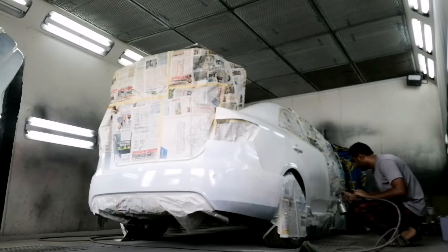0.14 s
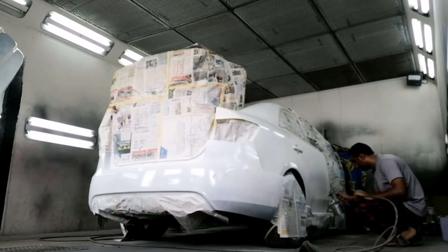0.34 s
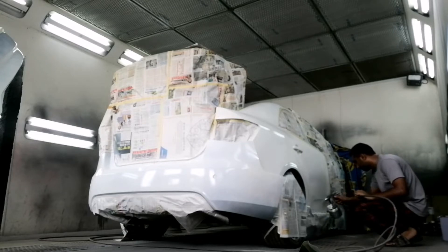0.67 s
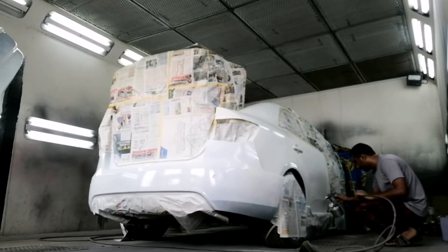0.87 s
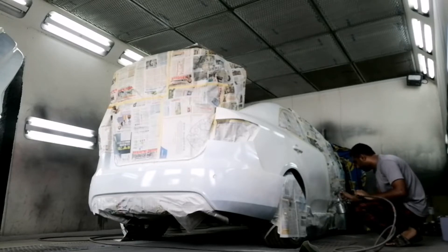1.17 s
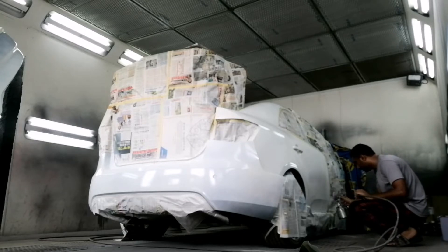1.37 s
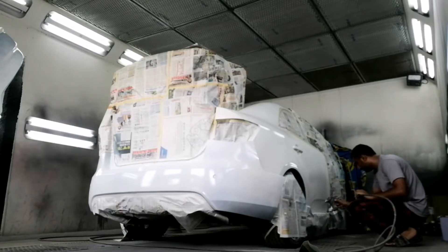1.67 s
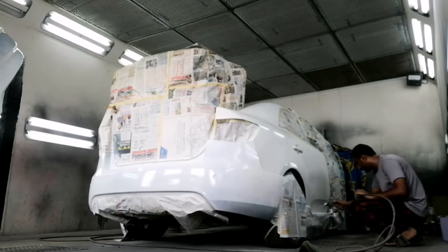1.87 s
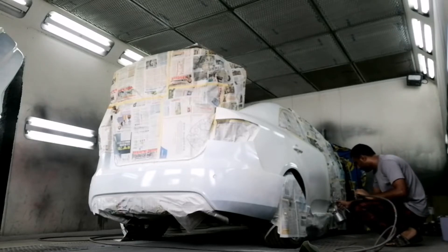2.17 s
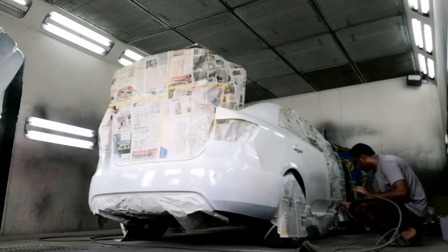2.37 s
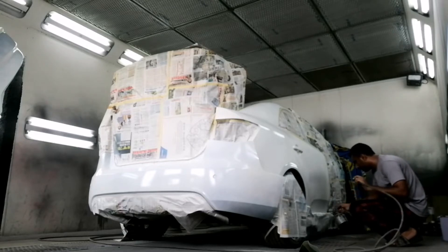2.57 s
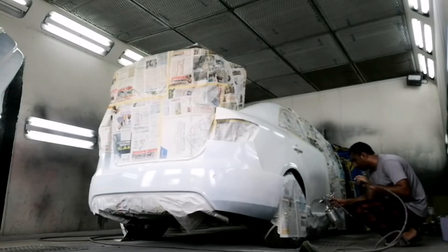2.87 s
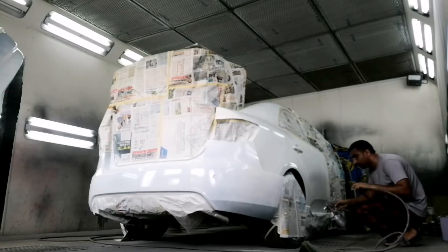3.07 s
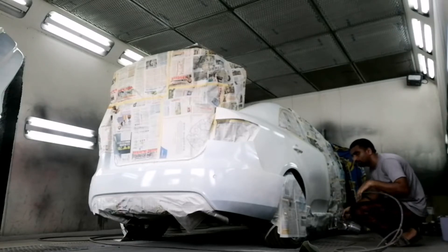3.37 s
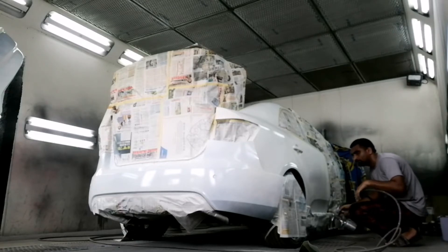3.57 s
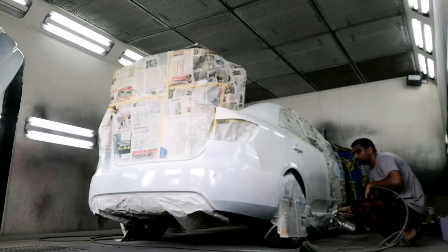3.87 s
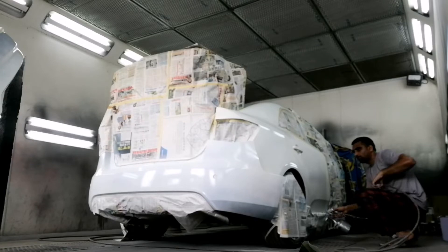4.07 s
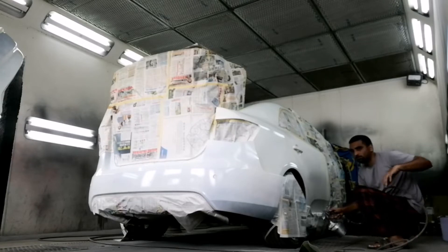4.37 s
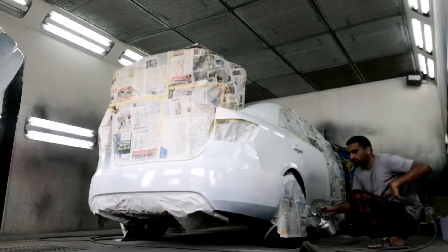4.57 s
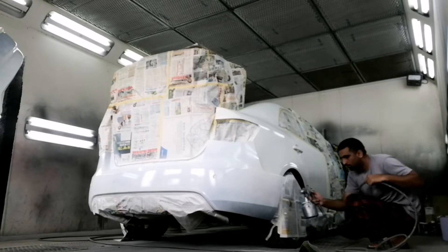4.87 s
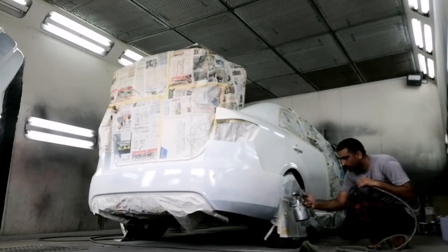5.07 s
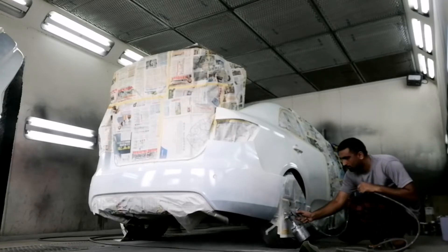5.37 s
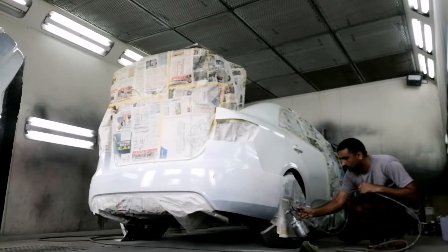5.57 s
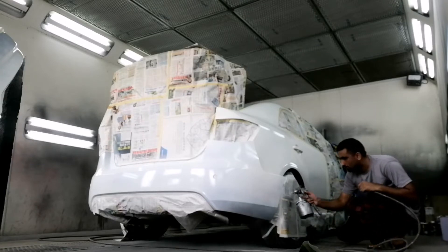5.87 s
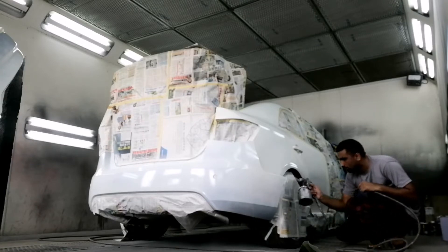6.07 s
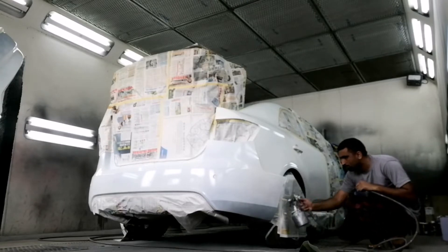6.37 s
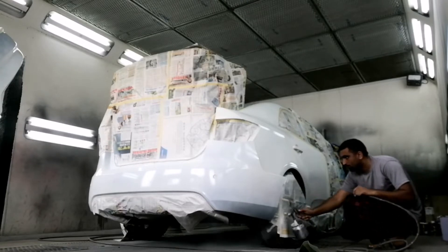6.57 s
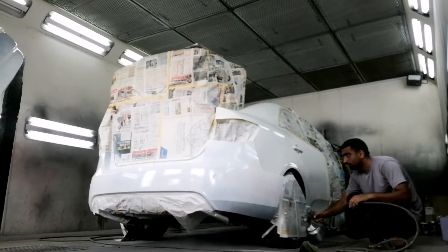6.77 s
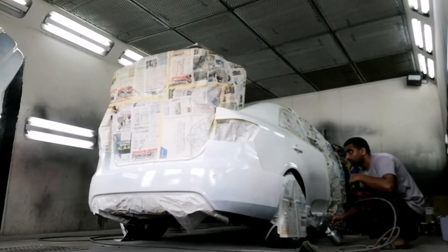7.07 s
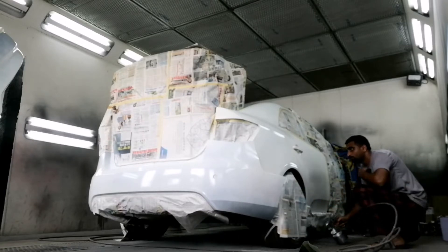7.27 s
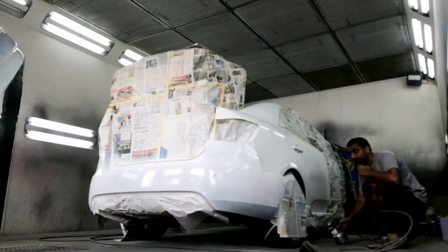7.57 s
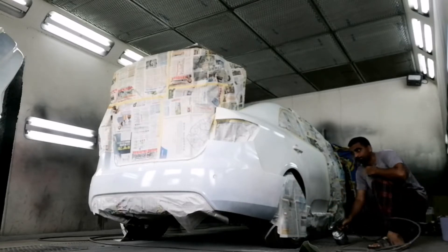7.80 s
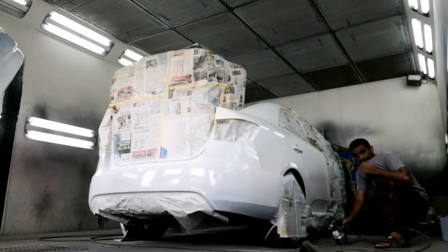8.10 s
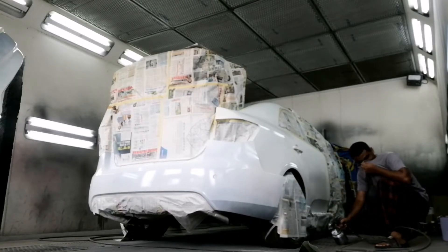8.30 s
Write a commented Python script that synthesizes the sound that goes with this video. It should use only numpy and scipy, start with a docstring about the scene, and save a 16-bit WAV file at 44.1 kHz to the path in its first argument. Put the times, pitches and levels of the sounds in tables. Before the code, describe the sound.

In a closed metal paint booth, a spray gun is already hissing as the sound begins. It stops abruptly, pauses briefly, then starts a second, long, brighter burst and cuts off again. Extraction fans rumble and hum throughout, sinking under the spray and slowly rising afterwards. A very faint scuff comes near the end. Stereo pickup on a small recorder with automatic level control.

```python
"""In a closed paint booth, a painter sprays the side of a car in two long pulls of the trigger.
The air jet is patchy filtered noise, changing colour and loudness as the gun sweeps along the panel.
The booth adds a short tail of echoes, and a faint scuff follows as the painter shifts.
Extraction fans run throughout: noise shaped by the booth's standing waves, plus a wavering hum.
Two microphone ports colour the treble, and the recorder's gain control turns all down under the spray."""
import sys
import numpy as np
from scipy import signal
from scipy.fft import rfft, irfft
from scipy.io import wavfile
from scipy.ndimage import uniform_filter1d

SR = 44100
rng = np.random.default_rng(int(sys.argv[2]) if len(sys.argv) > 2 else 0)


def pcm_store(signal):
    """Save signal as 16-bit PCM."""
    levels = np.round(np.clip(np.atleast_2d(signal), -1, 1) * 32767)
    wavfile.write(sys.argv[1], SR, levels.astype(np.int16).T)


N = 372204
TIME = np.arange(N) / SR  # s
FREQ = np.fft.rfftfreq(N, 1 / SR)  # Hz

# basic colour of the air jet: (frequency [Hz], relative level [dB per Hz])
JET_COLOUR = [(300, -100), (1000, -87), (2000, -92), (3200, -80.5), (3950, -84.5), (4500, -82.5),
              (6500, -84), (8000, -84.5), (10000, -86), (12500, -87.5), (15500, -87.5)]
# reflection off the panel that cancels a narrow band on the right as the gun works
# round the wheel arch: (time [s], frequency [Hz], depth [dB])
PANEL_NOTCH = [(4.5, 9600, 0), (4.9, 9700, -8), (5.3, 9250, -4), (5.9, 9370, -8), (6.2, 9700, -5),
               (6.45, 9300, -5), (6.75, 9550, -12)]


def jet(level_db=-1.5, pivot_hz=9000, beams_from_hz=5500, glint_hz=9860, glint_width_hz=650,
        notch_width_hz=190, patchy_db=2.0, bands_db=0.6):
    """Air rushing from the nozzle makes noise, its colour shifting as the gun sweeps along the panel."""
    hz, t, noise = signal.stft(rng.standard_normal((2, N)), SR, nperseg=512)
    hz = hz[:, None]
    loud_db, bright, lean_db, lift_db = sweep(t)

    # the treble beams forward, so it grows as the nozzle turns towards the listener
    octaves = np.log2(np.maximum(hz, beams_from_hz) / pivot_hz)
    colour_db = read(JET_COLOUR, hz) + bright * octaves

    # the glint is a bright band on the right
    glint_db = lift_db * np.exp(-0.5 * ((hz - glint_hz) / glint_width_hz) ** 2)
    notch_hz, depth_db = follow(PANEL_NOTCH, t)
    notch_db = depth_db * np.exp(-0.5 * ((hz - notch_hz) / notch_width_hz) ** 2)
    left_db = colour_db + lean_db / 2
    right_db = colour_db - lean_db / 2 + glint_db + notch_db

    # the paint breaks up unevenly, so patches of the hiss flare
    patches_db = patchy_db * drift(noise.shape, size=(8, 6))
    # near reflections add and cancel in fine, faint wandering bands
    wander_db = bands_db * drift(noise.shape, size=(4, 40))

    shaped = noise * gain_of(np.array([left_db, right_db]) + patches_db + wander_db)
    hiss = evened(signal.istft(shaped, SR)[1][:, :N])
    return hiss * gain_of(level_db + np.interp(TIME, t, loud_db)) * trigger()


# the gun as it sweeps along the panel:
# (time [s], aim towards the listener [dB], lean, left minus right [dB])
GUN_AIM = [(0, -0.5, 0), (.14, -3.5, -1), (.28, -1.5, 0), (.55, -0.3, 0), (.82, 1.5, -0.5),
           (1.15, -0.8, -0.5), (1.38, -3.5, 1), (1.6, -1.2, -0.5), (1.9, -1, 0), (2.25, -5, -2),
           (2.45, -4.7, -2), (2.75, -2.5, -3.5), (2.95, -2.5, -0.5), (3.14, 2, -0.8), (3.87, 3.5, -3),
           (4.06, 1, -2), (4.17, 5, -1), (4.29, 3.5, -2), (4.55, 6, 1), (4.85, 5, 0.5), (5.08, 5.5, 1),
           (5.18, 3.5, 1.5), (5.34, 2.5, 0), (5.5, 5, 0.5), (5.64, 2, 0.5), (5.88, 3, 1), (6.13, 1, 0),
           (6.33, 3.5, 0), (6.48, 3, 0), (6.72, 5, -0.5)]
# trigger pulls, also played by trigger(): (opens [s], closes [s], base hiss level [dB],
# base brightness [dB per octave], glint lift at opening [dB], glint fade time [s])
PULLS = [(-.1, 3.166, -38.5, 2, 3, 1.7), (3.847, 6.744, -39.5, 1.65, 4.5, 0.96)]


def sweep(t, beam_db_per_octave=0.73, wobble_db=0.25):
    """The more the wobbling hand aims the gun at the listener, the louder and brighter the latest pull."""
    pulls = np.array(PULLS)
    latest = np.maximum(np.searchsorted(pulls[:, 0], t, side="right") - 1, 0)
    start, _, loud_db, bright, lift_db, fade_s = pulls[latest].T

    aim_db, lean_db = follow(GUN_AIM, t)
    aim_db = aim_db + wobble_db * drift((1, len(t)), size=(1, 18))[0]

    brightness = bright + beam_db_per_octave * aim_db
    glint_lift_db = lift_db * np.exp(-(t - start) / fade_s)
    return loud_db + aim_db, brightness, lean_db, glint_lift_db


def trigger(open_s=0.0098, close_s=0.0027, spurt_db=2.0, spurt_s=0.022):
    """The valve opens with a spurt of stored pressure, and shuts off very quickly."""
    flow = np.zeros(N)
    for start, stop, *_ in PULLS:
        since = np.maximum(TIME - start, 0)
        after = np.maximum(TIME - stop, 0)
        valve = np.minimum(since / open_s, 1) ** 2 * np.exp(-after / close_s)
        flow += valve * gain_of(spurt_db * np.exp(-since / spurt_s))
    return flow


# faint scuff as the painter shifts: (time [s], level [dB], half length [s])
SCUFFS = [(8.02, -62, 0.029)]


def scuffs(low_hz=5000, high_hz=12000):
    """Rubbing makes a short, soft swish of high noise that swells and fades."""
    band = signal.butter(2, [low_hz, high_hz], "band", fs=SR, output="sos")
    swish = evened(signal.sosfilt(band, rng.standard_normal((2, N))))
    level = np.zeros(N)
    for middle, level_db, half_s in SCUFFS:
        level += gain_of(level_db) * np.exp(-0.5 * ((TIME - middle) / half_s) ** 2)
    return swish * level


# reverberation of the booth: (frequency [Hz], time to fall by 60 dB [s])
BOOTH_DECAY = [(1000, 0.2), (6000, 0.3), (10000, 0.24), (15000, 0.25)]


def booth(x, wet_db=-3, count=48):
    """The metal walls return dense, quickly dying echoes, whose pattern shifts steadily all the time."""
    # each tail is noise that dies away at its own rate for each frequency
    hz, t, noise = signal.stft(rng.standard_normal((count, 2, SR // 3)), SR, nperseg=256)
    fade = np.exp(-np.log(1000) * t / read(BOOTH_DECAY, hz)[:, None])
    tails = signal.istft(noise * fade, SR)[1]
    tails /= np.linalg.norm(tails, axis=-1, keepdims=True)

    # crossfade from each tail to the next
    place = np.linspace(0, count - 1, N)
    room = np.zeros((2, N + SR))
    for k, tail in enumerate(tails):
        near = np.flatnonzero(abs(place - k) < 1)
        share = np.sqrt(1 - abs(place[near] - k))
        echo = signal.fftconvolve(x[:, near] * share, tail, axes=1)
        room[:, near[0]:near[0] + echo.shape[1]] += echo

    wet = gain_of(wet_db)
    return (x + wet * room[:, :N]) / np.sqrt(1 + wet ** 2)


# basic colour of the extraction fans: (frequency [Hz], relative level [dB per Hz])
FAN_COLOUR = [(15, -83), (40, -62), (150, -55.5), (250, -61.5), (320, -69.5), (750, -71.5), (1000, -76),
              (1500, -81.5), (2500, -80), (3300, -83), (4000, -87.5), (5800, -92), (7500, -99.5),
              (10000, -106.5), (15000, -114.3), (15600, -135)]
# standing waves of the booth, and the nulls between them:
# (frequency [Hz], width [Hz], left [dB], right [dB])
BOOTH_MODES = [(53.3, 7.7, 9, 10.5), (85.5, 6.3, 12.5, 11), (91.1, 4.6, -12.5, -18), (98.1, 6.1, 6.5, 8.5),
               (113, 11.4, 0, 0.5), (146, 13.8, 6, 5), (161.7, 11.5, 8, 7), (180.7, 17.8, -3, -7),
               (192, 6, -2, -2.5), (197.3, 8, 0.5, 1.5), (210, 9.1, 0, 4), (240, 22, -1.5, -0.5),
               (257, 10, 2, 1.5), (269.9, 14.2, 6.5, 7), (284, 11.9, 7.5, 8.5), (293, 12.4, -6, -4.5),
               (334, 18, 3, 5.5), (430, 32, -6, -5), (451.2, 14, 7.5, 10), (494.7, 20, 9, -7),
               (520, 17, -4, -3), (554, 22, 3, 2), (586, 40, 5, 0), (638, 19, -0.5, -5), (677.6, 23, 9, -2),
               (732, 13, 2, -1), (750, 16, 3, 3), (785, 18, 1.5, 2.5), (816, 12, 10, 5), (862, 16, 4, 7),
               (903, 40, 1, -2)]
# side the fans are heard from: (frequency [Hz], left minus right [dB])
FAN_LEAN = [(30, 3.5), (60, 3.2), (120, 0.8), (200, -1), (350, 1), (550, -0.6), (900, 5), (1500, 0.5)]
# likeness of the fan noise at the two ports: (frequency [Hz], correlation [-1 to 1])
LIKENESS = [(60, 0.99), (170, 0.98), (305, 0.87), (400, -0.63), (560, 0.06), (740, -0.19), (1420, 0.1),
            (1630, -0.62), (2200, -0.15), (5000, -0.026)]
# slow relative level of the fans' bass, whose drone column also guides hum():
# (time [s], deepest rumble [dB], throb [dB], drone [dB])
FAN_BASS = [(0.0, 1, -1.5, 0), (0.6, -1.5, 0.0, 0.5), (1.05, 3, 0, 2), (1.35, 1, -1.5, 2.5),
            (1.7, 4, 2, 1.2), (2.0, -3.5, -2, 1.5), (2.8, 3.5, -1.5, 1.5), (3.0, 6, -2, -4),
            (3.1, -3, -1, -1), (3.4, 8, 1, -5), (3.9, -1, -1, -2), (4.8, 2, -0.5, -2.5), (5.1, -1, -8, 4.5),
            (5.2, 4, -3, 0.5), (5.4, 0, 2.5, -1.5), (6.0, 1.5, -4.5, 0.5), (6.8, 2, -1, -1.5),
            (7.0, 3, 0.5, -1), (7.6, 0, -2.5, 0), (7.8, 5, -2.5, -5.5), (8.15, -3, 1.5, 2),
            (8.42, 1, -1.5, -4.5)]
# slow relative level of the fans' rush: (time [s], level [dB])
FAN_RUSH = [(0, 0), (.4, 0.6), (.9, 0.5), (1.2, 0.1), (1.55, 0.57), (2.0, -1.1), (2.6, 0.5), (3.1, 0),
            (3.5, 1.6), (3.9, -0.4), (4.3, 1), (4.7, -0.5), (5.45, -0.1), (6.05, 1), (6.7, -0.1),
            (6.95, 0.6), (7.9, 0.8), (8.12, -0.94), (8.35, 0.5)]


def fans(deep_hz=68, low_hz=125, high_hz=190, hiss_hz=1300, deep_db=0.5, throb_db=2.0,
         drone_db=0.5, rush_db=1.26, hiss_db=1.0, swell_db=0.47):
    """Turbulent air drives the booth's standing waves: rumble, throb, drone, wide rush and hiss."""
    # two noises, partly alike at the two ports
    a, b = rfft(rng.standard_normal((2, N))) * np.sqrt(SR / 2)
    same = np.clip(read(LIKENESS, FREQ), -1, 1)
    air = np.array([a, same * a + np.sqrt(1 - same ** 2) * b])
    half_lean_db = np.array([[0.5], [-0.5]]) * read(FAN_LEAN, FREQ)
    air *= gain_of(read(FAN_COLOUR, FREQ) + resonances_db(BOOTH_MODES) + half_lean_db)

    # each low-pass keeps what lies below its edge; differences between them give the bands
    deep, low, high, top = (1 / (1 + (FREQ / hz) ** 12) for hz in (deep_hz, low_hz, high_hz, hiss_hz))

    # the draught swells and slackens a little, at random
    draught_db = swell_db * drift((1, N), size=(1, 20000))[0]
    rumble_curve, throb_curve, drone_curve = follow(FAN_BASS, TIME)
    rush_curve = follow(FAN_RUSH, TIME)[0]

    rumble = ride(irfft(air * deep, N), draught_db + rumble_curve, size=12000)
    throb = ride(irfft(air * (low - deep), N), draught_db + throb_curve, size=9000)
    drone = ride(irfft(air * (high - low), N), draught_db + drone_curve, size=7000)
    rush = irfft(air * (top - high), N) * evened(gain_of(draught_db + rush_curve))
    hiss = irfft(air * (1 - top), N) * evened(gain_of(draught_db))

    bass = gain_of(deep_db) * rumble + gain_of(throb_db) * throb + gain_of(drone_db) * drone
    return bass + gain_of(rush_db) * rush + gain_of(hiss_db) * hiss


def hum(hz=161.4, level_db=-41, waver_hz=1.97, waver_db=1.1):
    """The fan blades add a slightly wavering note that follows the drone's level curve."""
    pitch_drift, level_drift = drift((2, N), size=(1, 9000))
    turns = np.cumsum(hz + waver_hz * pitch_drift) / SR
    drone_curve = follow(FAN_BASS, TIME)[2]
    note = np.sqrt(2) * np.sin(2 * np.pi * turns)  # rms of 1
    return note * gain_of(level_db + drone_curve + waver_db * level_drift)


def gain_control(x, sense_hz=10500, knee_db=-38, slope=0.55, react_s=0.022, recover_db_per_s=11):
    """The recorder turns everything down as treble grows and recovers slowly: rumble sinks under hiss."""
    high_pass = signal.butter(2, sense_hz, "high", fs=SR, output="sos")
    treble = signal.sosfilt(high_pass, x)
    keep = np.exp(-1 / (react_s * SR))
    power = signal.lfilter([1 - keep], [1, -keep], (treble ** 2).mean(0))
    wanted_cut_db = slope * 10 * np.log10(1 + power / gain_of(knee_db) ** 2)

    # the cut may rise at once, but falls no faster than the recovery rate
    recovery_db = recover_db_per_s * TIME
    cut_db = np.maximum.accumulate(wanted_cut_db + recovery_db) - recovery_db
    return x / gain_of(cut_db)


def gain_of(db):
    """Turns decibels into amplitude."""
    return 10 ** (np.asarray(db) / 20)


def evened(x):
    """Scales to an rms of 1."""
    return x / np.sqrt(np.mean(x ** 2) + 1e-20)


def read(points, hz):
    """Joins (frequency, value) points by straight lines on a log-frequency axis."""
    f, value = np.transpose(points)
    return np.interp(np.log(hz + 1), np.log(f + 1), value)


def follow(rows, t):
    """Joins (time, value, ...) rows by straight lines: one curve for each value column."""
    s, *columns = np.transpose(rows)
    return [np.interp(t, s, column) for column in columns]


def resonances_db(modes):
    """Adds up bell-shaped peaks and dips into a left and right response in dB."""
    total_db = np.zeros((2, len(FREQ)))
    for hz, width, left, right in modes:
        total_db += np.array([[left], [right]]) / (1 + (2 * (FREQ - hz) / width) ** 2)
    return total_db


def drift(shape, size):
    """Smooths random noise into a field of rms 1, averaging over the given size in each direction."""
    field = uniform_filter1d(rng.standard_normal(shape), size[0], axis=-2)
    return evened(uniform_filter1d(field, size[1], axis=-1))


def ride(x, level_db, size):
    """Makes the slow level of a noise follow a curve about its own mean level."""
    power = uniform_filter1d((x ** 2).mean(0), size)
    return x * np.sqrt(power.mean() / (power + 1e-20)) * evened(gain_of(level_db))


def scene():
    """Gun and painter sound in the booth, over the fans."""
    return booth(jet() + scuffs()) + fans() + hum()


# resonances of the microphone ports: (frequency [Hz], width [Hz], left [dB], right [dB])
PORTS = [(3180, 450, 3, 0), (3790, 1100, -7, -8), (5245, 450, 6.5, -1), (6230, 1540, 9, -2),
         (7250, 250, 1.5, 1), (7850, 380, -4, -2), (8500, 400, 3, 0), (9170, 330, 0, 2.5),
         (9760, 2300, -0.5, 13), (9890, 470, 1, 3), (11030, 200, -6, 2.5), (11600, 400, 1.5, 0.5),
         (12450, 3900, 2, 3), (14200, 400, -1.5, -3), (14700, 1050, 8.5, 6.5)]


def record(dry, edge_hz=15350):
    """The ports colour each side; then come gain control and the band limit."""
    soft_ends = np.minimum(np.minimum(TIME, TIME[::-1]) / 0.004, 1)  # 4 ms fades
    coloured = irfft(rfft(dry * soft_ends) * gain_of(resonances_db(PORTS)), N)
    band_limit = signal.firwin(401, edge_hz, window=("kaiser", 9), fs=SR)
    return signal.oaconvolve(gain_control(coloured), band_limit[None], "same")


dry = scene()
out = record(dry)
pcm_store(out)
```